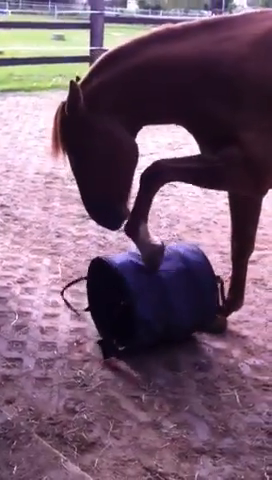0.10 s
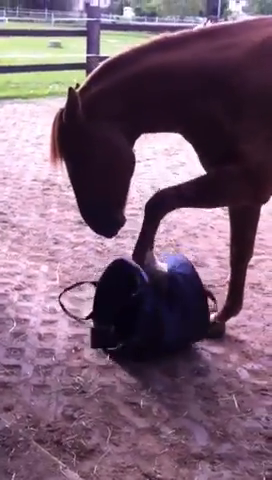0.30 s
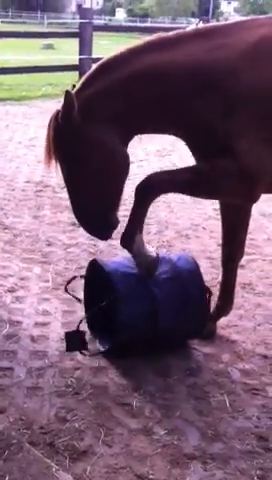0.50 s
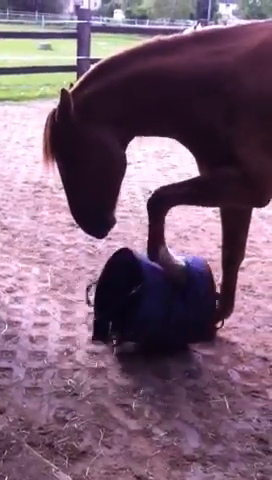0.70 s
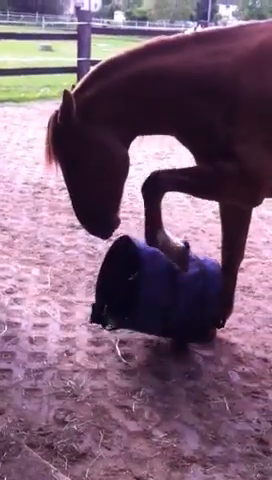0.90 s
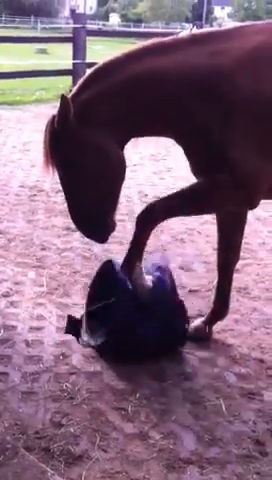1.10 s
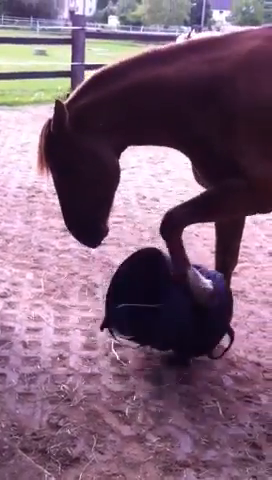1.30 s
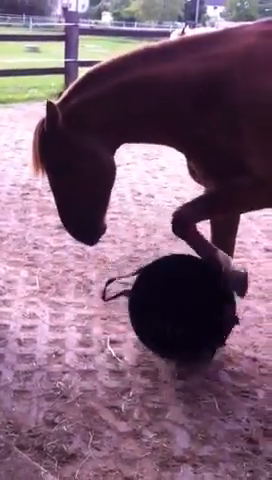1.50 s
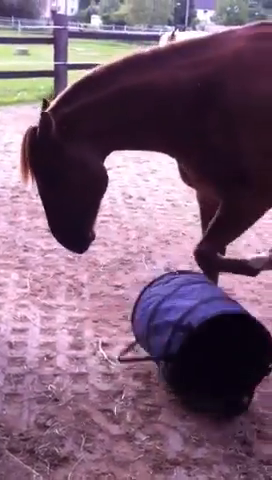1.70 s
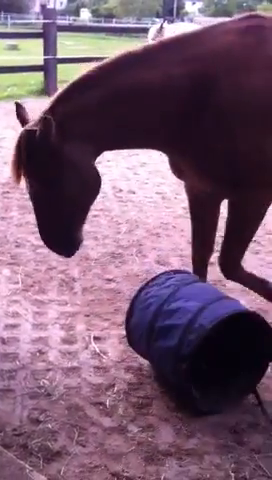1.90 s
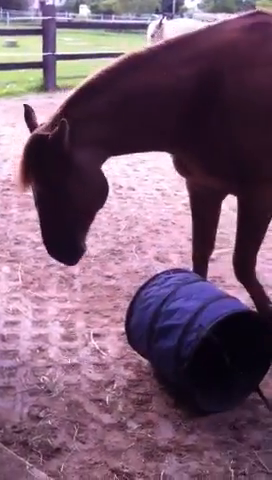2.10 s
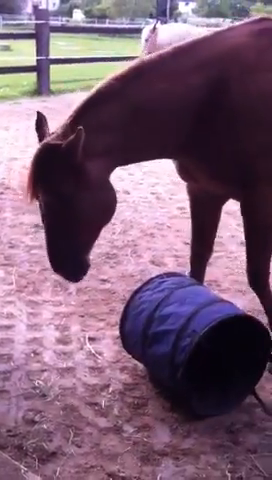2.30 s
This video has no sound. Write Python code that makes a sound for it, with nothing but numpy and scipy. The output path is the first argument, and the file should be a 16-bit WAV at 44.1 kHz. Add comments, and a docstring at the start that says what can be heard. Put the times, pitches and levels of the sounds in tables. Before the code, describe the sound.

Nylon fabric rustles and buckles under a horse's hoof, with low drum-like thuds, cloth snaps and quick swipes, a brief lull, a loud burst, then knocks as the bin springs loose; close pickup, short soft echo.

```python
"""In a riding arena, a horse paws a collapsible nylon bin on sand, which buckles and springs out from under the hoof.
Rubbing, swipes, crumpling, flapping and snaps are random clicks, shaped in level and filtered.
Blows are short swelling tones, creases are single clicks, and a bank of resonances rings like the hollow drum.
The arena adds a short tail of scattered reflections, over its quiet background air, a steady, soft noise."""
import sys
import numpy as np
from scipy import signal
from scipy.io import wavfile
from scipy.ndimage import uniform_filter1d

SR = 44100
rng = np.random.default_rng(int(sys.argv[2]) if len(sys.argv) > 2 else 0)


def wav_record(signal):
    """Record a signal, one row per channel, as 16-bit PCM in the file named by sys.argv[1]."""
    frames = np.transpose(np.atleast_2d(signal))
    bounded = np.clip(frames, -1, 1)
    # unit amplitude maps onto the largest positive 16-bit level
    quanta = np.round(bounded * 32767).astype(np.int16)
    wavfile.write(sys.argv[1], SR, quanta)


N = 101430  # length in samples, 2.3 seconds

# Tone of the arena's quiet background air. Each row: frequency in Hz, relative level in dB.
AIR_COLOUR = [(20, -16), (90, 1.5), (700, 6), (2000, -27), (16000, -40)]
# How long the arena's echo lasts. Each row: frequency in Hz, time to fade by 60 dB in seconds.
ARENA_FADE = [(100, 0.45), (300, 0.71), (1000, 0.45), (3000, 0.14), (8000, 0.25), (16000, 0.86)]
# Hoof and sand rubbing the cloth. Each row: time in seconds, level in dB before the trims,
# level of the fine fizz relative to that in dB.
RUB_CURVE = [(0.0, -41.5, -0.5), (0.18, -53, -5), (0.21, -43.5, -9), (0.34, -41.5, 1), (0.36, -32.5, -9),
             (0.51, -36, -5.5), (0.63, -44.5, -3.5), (0.72, -32, -7), (0.748, -33.5, -12), (0.79, -37, -10),
             (0.82, -33, -2), (0.89, -44, -5), (0.97, -47, -1.5), (1.04, -61.5, -7), (1.08, -51.5, 1.5),
             (1.15, -53, -5.5), (1.21, -25.5, -10), (1.25, -29.5, -16), (1.33, -29, -5.5),
             (1.45, -42.5, -6), (1.55, -34.5, -4), (1.56, -32, -11), (1.63, -44, -0.5), (1.68, -38.5, -15),
             (1.74, -65, 1), (1.79, -50, -20), (1.79, -47, 4), (1.81, -35.5, 1), (1.9, -56.5, -3),
             (1.92, -40.5, -4.5), (1.97, -56.5, -7), (2.04, -43.5, -1.5), (2.07, -50, -6.5),
             (2.2, -55.5, -4.5), (2.21, -50, -0.5), (2.3, -66, -9)]
# Tone of the rasp. Each row: frequency in Hz, relative level in dB.
RASP_COLOUR = [(100, -93), (800, -4), (1600, 2), (2300, 2), (3200, 0.5), (5000, -1), (7000, -7.5),
               (10000, -14), (16000, -27.5)]
# Tone of the finer fizz. Each row: frequency in Hz, relative level in dB.
WEAVE_FIZZ_COLOUR = [(500, -67), (4000, -19), (6500, -1.5), (8000, -1.5), (11000, -3.5), (14000, -5.5),
                     (16000, -12.5)]
# Quick swipes of the hoof over the cloth. Each row: middle in seconds, level in dB, half length in seconds.
HOOF_SWIPES = [(0.472, -34.5, 0.01), (0.715, -34.5, .009), (0.852, -46, 0.012), (1.248, -29, 0.0078),
               (1.265, -28, 0.0021), (1.315, -28, 0.017), (1.41, -38, 0.015)]
# Tone of a swipe. Each row: frequency in Hz, relative level in dB.
ZIP_COLOUR = [(300, -41), (1500, 11.5), (4000, -1), (7500, 3.5), (12000, -3), (16000, -10)]
# Tone of the slack wall pushing air. Each row: frequency in Hz, relative level in dB.
AIR_PUSH_COLOUR = [(20, -51), (60, -30.5), (100, -29), (135, -9), (180, -1), (240, 0), (320, -13.5),
                   (450, -18), (900, -63)]
# Crumpling of the wall. Each row: time in seconds, level in dB before the trims.
CRUMPLE_CURVE = [(0.0, -34.5), (0.04, -37), (0.06, -34), (0.08, -32.5), (0.34, -33.5), (0.38, -22),
                 (0.47, -29.5), (0.49, -20), (0.58, -27.5), (0.59, -33.5), (0.81, -27.5), (0.93, -42),
                 (0.97, -34), (1.07, -60), (1.08, -27), (1.14, -43.5), (1.17, -33), (1.2, -18.5),
                 (1.43, -27), (1.48, -39.5), (1.57, -37), (1.66, -31.5), (1.68, -25.5), (1.78, -63),
                 (1.8, -24.5), (1.95, -37.5), (1.99, -44), (2.02, -35.5), (2.16, -46.5), (2.3, -62.5)]
# Tone of folds in the stiff wall. Each row: frequency in Hz, relative level in dB.
FOLD_COLOUR = [(30, -67), (110, -17), (200, 1), (350, 5), (550, 0), (850, 0.5), (1100, -5.5), (1600, -7),
               (2300, -19.5), (4000, -52), (16000, -74.5)]
# Resonances of the hooped drum. Each row: frequency in Hz when not pressed,
# strength in dB before weighting by fade time, time to fade by 60 dB in seconds.
DRUM_MODES = [(140.5, 0, 0.27), (173, 6, 0.13), (229, 2.5, 0.23), (334.2, 2, 0.4), (497, 3.5, 0.26),
              (590.4, 10.5, 0.15), (717, 3, 0.095), (834, -3, 0.13), (928, 6, 0.15)]
# Cloth snapping taut and slapping down. Each row: start in seconds, level in dB before the trims,
# rise in seconds, decay in seconds, crack level relative to the body in dB before the trims.
CLOTH_SNAPS = [(0.057, -25.5, 0.0068, 0.018, -15), (0.15, -33, 0.0023, 0.014, -8.5),
               (0.197, -31, 0.00092, 0.012, -5.5), (0.239, -27.5, 0.0015, 0.036, -9.5),
               (0.356, -29.5, 0.0027, 0.022, -2), (0.426, -33.5, 0.0022, 0.012, 4.5),
               (.481, -21.5, 0.011, 0.019, -6.5), (0.529, -21.5, 0.0099, 0.0069, -15),
               (0.569, -21.5, 0.0045, 0.011, -15), (.705, -36.5, .015, 0.012, -4),
               (0.763, -26, 0.01, 0.0089, -1), (0.950, -27, 0.029, 0.032, -25),
               (1.077, -31, 0.0024, 0.013, -10.5), (1.179, -19, 0.0058, 0.012, -11),
               (1.197, -17, 0.0015, 0.0079, -9), (1.219, -22.5, 0.0012, 0.023, -4),
               (1.285, -19.5, .002, 0.0097, -11), (1.556, -25, 0.00059, 0.0092, 0.5),
               (1.593, -32, 0.0031, 0.024, -0.5), (1.674, -23, 0.0083, 0.032, -19.5),
               (1.793, -23, 0.0037, 0.032, -4), (1.830, -24, 0.0097, 0.019, -19),
               (2.002, -27, 0.0019, 0.018, -14.5), (2.025, -36, 0.0033, 0.013, -2.5),
               (2.208, -45.5, 0.0049, 0.016, -1.5)]
# Tone of the bright crack. Each row: frequency in Hz, relative level in dB.
SNAP_CRACK_COLOUR = [(200, -13.5), (1000, 6), (2000, 4.5), (4500, -2), (7000, -5.5), (11000, -16),
                     (16000, -24)]
# Single creases popping through the wall. Each row: time in seconds, click level in dB before the filter.
CREASE_POPS = [(.201, -8), (.541, 0), (0.641, -7.5), (1.224, 3.5), (1.233, 2.5), (1.244, -1.5)]
# Blows on the drum. Each row: start in seconds, level in dB before the trim, pitch in Hz,
# swell time in seconds (the blow is loudest after twice this).
DRUM_BLOWS = [(.075, -28.5, 217, 0.012), (.165, -23, 200, 0.0029), (0.239, -29, 168, .006),
              (0.390, -25, 215, 0.0091), (0.487, -8, 203, 0.0039), (0.659, -28.5, 168, 0.0028),
              (.754, -16.5, 200, 0.0026), (.805, -27, 216, 0.0065), (.946, -20.5, 257, 0.0055),
              (0.972, -25, 176.4, 0.0067), (1.086, -23, 181, 0.0052), (1.187, -6.5, 196, 0.0036),
              (1.213, -19, 323, 0.0095), (1.257, -21, 155.4, 0.0058), (1.386, -17.5, 220, 0.0092),
              (1.676, -10.5, 225, 0.0027), (1.697, -13.5, 230, 0.0023), (1.723, -25.5, 257, 0.0055),
              (1.848, -10.5, 183.6, 0.0027), (1.875, -23, 143, 0.004), (1.918, -24.5, 157, 0.0058),
              (2.004, -26.5, 192, 0.0079), (2.15, -28.5, 178, 0.0043)]

AIR_DB = -54
RASP_TRIM_DB, FIZZ_TRIM_DB, CRUMPLE_TRIM_DB, FLAP_TRIM_DB, THUMP_TRIM_DB = -1, -1, -3, -21.5, -2.5
SNAP_BODY_TRIM_DB, SNAP_CRACK_TRIM_DB = -2.5, 1
SLIPS_PER_S, FOLDS_PER_S, FLAPS_PER_S = 5000, 900, 220  # average counts per second
# The cloth catches and lets go in clumps: smoothing length, and typical swing in level.
CLUMP_S, CLUMP_DB = 0.009, 1.5
# The slack wall flaps with the crumpling, but swells and fades less: share of its level in dB.
FLAP_FOLLOWS = 0.62
# The hoof presses the bin in a steady rhythm until it springs free.
PAW_S, FREE_S = 0.5, 1.5  # seconds from press to press, and moment of release
SQUASH = 0.046  # largest drop of the resonances, as a share of their pitch
RADIATE_HZ = 115.6  # the small drum gives out little sound below this
EDGE_HZ = 15950  # top of the sound


def amp(db):
    """Turns decibels into a gain."""
    return 10 ** (np.asarray(db) / 20)


def evened(x):
    """Scales to an average (rms) size of one."""
    return x / np.sqrt(np.mean(x ** 2) + 1e-20)


def read(points, hz):
    """Reads between the rows of a table, on a log-frequency axis."""
    f, value = np.transpose(points)
    return np.interp(np.log(hz + 1), np.log(f + 1), value)


def follow(table, axis=1):
    """Gives one column of a time curve at every sample."""
    table = np.array(table)
    return np.interp(np.arange(N) / SR, table[:, 0], table[:, axis])


def add(mix, s, sound):
    """Mixes a sound in, starting at s seconds."""
    part = mix[max(round(s * SR), 0):][:len(sound)]
    part += sound[:len(part)]


def colour(x, points, size=4096):
    """Filters to the given tone; the filter has unit energy and never sounds ahead of its input."""
    gain = amp(read(points, abs(np.fft.fftfreq(size, 1 / SR))))
    # the Hilbert transform finds the phase that puts the energy as early as possible
    spectrum = np.exp(np.conj(signal.hilbert(np.log(gain))))
    taps = np.fft.ifft(spectrum).real[:size // 2]
    return signal.fftconvolve(x, taps / np.linalg.norm(taps))[:N]


def clicks(per_s, spread_db, steady_s):
    """Random clicks, uneven when spread_db is above 0, with power held near one over about steady_s."""
    size = amp(spread_db * np.minimum(rng.exponential(1, N), 4))
    happens = rng.random(N) < per_s / SR
    train = size * rng.choice([-1., 1.], N) * happens
    window = np.hanning(max(int(steady_s * SR), 2) + 2)
    power = signal.fftconvolve(train ** 2, window / window.sum(), "same")
    return train / np.sqrt(abs(power) + 1e-6)


def drum(x, ring_db):
    """Adds the ringing of the hooped drum, whose pitch sinks under each press of the hoof."""
    press = np.sin(np.pi * np.minimum(np.arange(N) / SR, FREE_S) / PAW_S) ** 2
    bent_s = np.cumsum(1 - SQUASH * press) / SR  # time runs slower while pressed, so pitch drops
    top = max(amp(db) * t60 for hz, db, t60 in DRUM_MODES)
    ring = 0
    for hz, db, t60 in DRUM_MODES:
        turn = np.exp(2j * np.pi * hz * bent_s)
        keep = np.exp(-np.log(1000) / (t60 * SR))  # share left after one sample
        # shift the resonance down to 0 Hz, let it ring there, then shift it back
        envelope = signal.lfilter([1 - keep], [1, -keep], x / turn + 1e-18)
        ring = ring + amp(db) * t60 / top * 2 * (turn * envelope).real
    return x + amp(ring_db) * ring


def radiate(x):
    """Steeply cuts the bass, which a small drum cannot push into the air."""
    return signal.sosfilt(signal.butter(4, RADIATE_HZ, "high", fs=SR, output="sos"), x)


def quiet_air():
    """Quiet background air of the arena: steady, soft noise."""
    return amp(AIR_DB) * colour(rng.standard_normal(N), AIR_COLOUR)


def arena(x, wet_db, gap_s=0.007):
    """Adds a tail of scattered reflections; each frequency fades at its own rate, fastest near 3000 Hz."""
    taps = rng.standard_normal(SR) * (rng.random(SR) < 0.1) * (np.arange(SR) > gap_s * SR)
    hz, t, bands = signal.stft(taps, SR, nperseg=256)
    fade = amp(-60 * t / read(ARENA_FADE, hz)[:, None])
    tail = signal.istft(bands * fade, SR)[1]
    echo = signal.fftconvolve(x, tail / np.linalg.norm(tail))[:N]
    return (x + amp(wet_db) * echo) / np.hypot(1, amp(wet_db))


def clumps():
    """Uneven catching and slipping of the cloth, as a random, smoothed level in dB."""
    size = int(CLUMP_S * SR)
    smooth = uniform_filter1d(rng.standard_normal(N), size)
    return CLUMP_DB * evened(uniform_filter1d(smooth, size // 3))


def rubbing():
    """Tiny slips on the weave give a rasp and a finer fizz."""
    level = follow(RUB_CURVE) + clumps()
    slips = clicks(SLIPS_PER_S, spread_db=0.5, steady_s=0.022) * amp(level)
    fizz_level = level + follow(RUB_CURVE, axis=2)
    weave = clicks(2 * SLIPS_PER_S, spread_db=0.0, steady_s=0.0093) * amp(fizz_level)
    rasp = amp(RASP_TRIM_DB) * colour(slips, RASP_COLOUR)
    return rasp + amp(FIZZ_TRIM_DB) * colour(weave, WEAVE_FIZZ_COLOUR)


def swipes():
    """The hoof sweeps over the weave: short, bright zips that swell and fade evenly."""
    t = np.arange(N) / SR
    shape = sum(amp(db) * np.exp(-0.5 * ((t - s) / half_s) ** 2) for s, db, half_s in HOOF_SWIPES)
    return colour(clicks(SLIPS_PER_S, spread_db=0, steady_s=0.0061) * shape, ZIP_COLOUR)


def flapping():
    """The slack wall pushes the air inside the bin and rings the drum."""
    level = FLAP_FOLLOWS * follow(CRUMPLE_CURVE) + FLAP_TRIM_DB
    pushes = clicks(FLAPS_PER_S, spread_db=0.0, steady_s=0.057) * amp(level)
    return drum(colour(pushes, AIR_PUSH_COLOUR), ring_db=10)


def crumpling():
    """Folds pop through the stiff wall and ring the drum."""
    level = follow(CRUMPLE_CURVE) + CRUMPLE_TRIM_DB
    folds = clicks(FOLDS_PER_S, spread_db=1.0, steady_s=0.043) * amp(level)
    return drum(colour(folds, FOLD_COLOUR), ring_db=4.0)


def snaps():
    """Quick bursts of folds: a dull slap of the wall and a bright crack of the weave."""
    body, crack, t = np.zeros(N), np.zeros(N), np.arange(SR // 4) / SR
    for s, db, rise_s, decay_s, crack_db in CLOTH_SNAPS:
        shape = amp(db) * np.minimum(t / rise_s, np.exp(-(t - rise_s) / decay_s))
        add(body, s, shape)
        add(crack, s, shape * amp(crack_db))
    slap = colour(body * clicks(2000, spread_db=4.0, steady_s=0.0049), FOLD_COLOUR)
    tick = colour(crack * clicks(2500, spread_db=0, steady_s=0.0037), SNAP_CRACK_COLOUR)
    return amp(SNAP_BODY_TRIM_DB) * drum(slap, ring_db=3.5) + amp(SNAP_CRACK_TRIM_DB) * tick


def pops():
    """A crease flips over all at once: one click through wall and drum, a hard, hollow knock."""
    flips = np.zeros(N)
    for s, db in CREASE_POPS:
        add(flips, s, [amp(db)])
    return drum(colour(flips, FOLD_COLOUR), ring_db=9)


def thumps(thud_db=-40):
    """Each blow swells and dies as a tone of the hollow; harder blows thud far more in the ground."""
    blows, thud, t = np.zeros(N), np.zeros(N), np.arange(SR // 5) / SR
    for s, db, hz, swell_s in DRUM_BLOWS:
        u = t / swell_s
        shape = amp(db + THUMP_TRIM_DB) * (u / 2) ** 2 * np.exp(2 - u)
        add(blows, s, shape * np.sin(2 * np.pi * hz * t))
        add(thud, s, shape * amp(db / 2))
    # the ground's thud is low noise, strongest near 200 Hz
    ground = colour(rng.standard_normal(N), [(20, -17), (90, -24), (200, 22), (600, -62)])
    return radiate(drum(blows, ring_db=-14)) + amp(thud_db) * thud * ground


def scene():
    """The bin in the arena, over its quiet background air; each group has its own amount of echo."""
    air = quiet_air()
    rubbed = arena(rubbing() + swipes(), wet_db=-16.5)
    wall = arena(crumpling() + flapping(), wet_db=-10.5)
    sharp = arena(snaps() + pops(), wet_db=-9.5)
    blows = arena(thumps(), wet_db=-14.5)
    return (rubbed + wall + sharp + blows + air)[None]


def record(dry):
    """Cuts off the sound above EDGE_HZ with a steep filter."""
    taps = signal.firwin(511, EDGE_HZ, window=("kaiser", 9), fs=SR)
    return signal.oaconvolve(dry, taps[None], "same")


dry = scene()
out = record(dry)
wav_record(out)
```